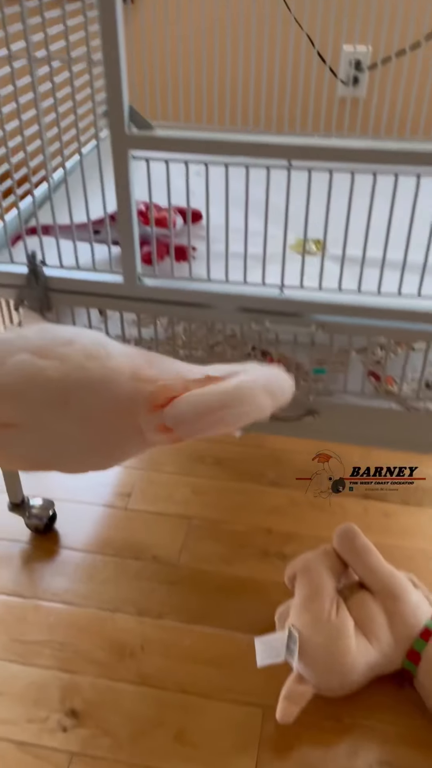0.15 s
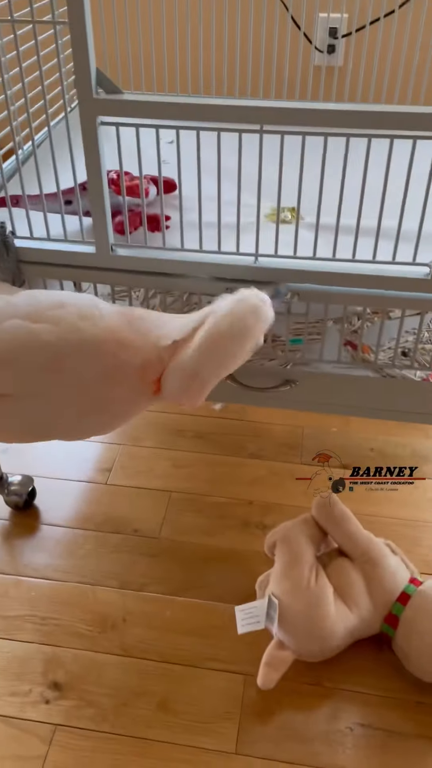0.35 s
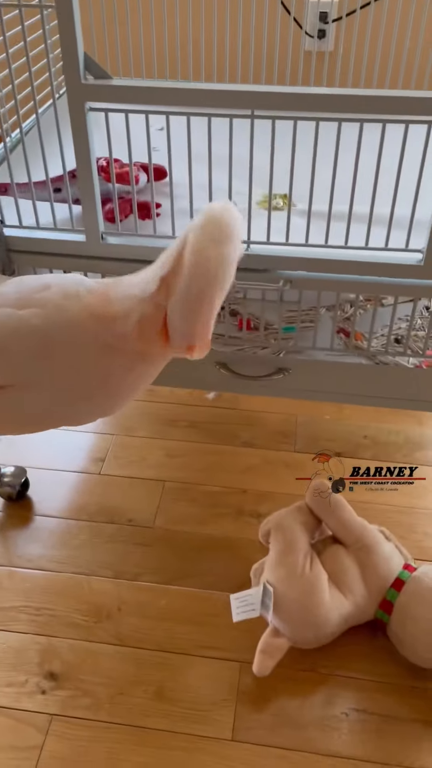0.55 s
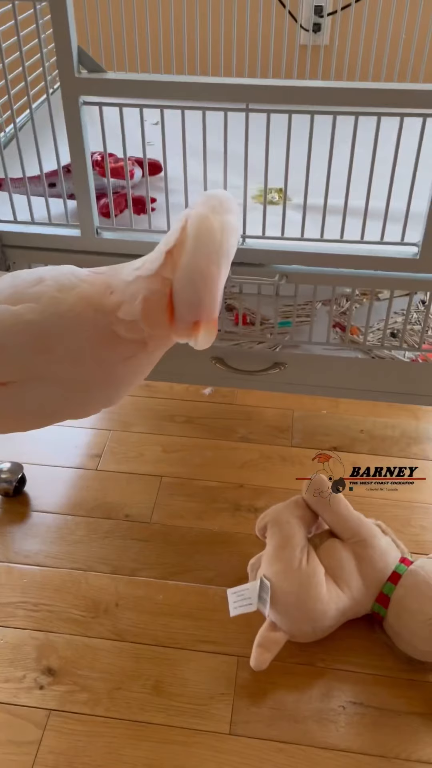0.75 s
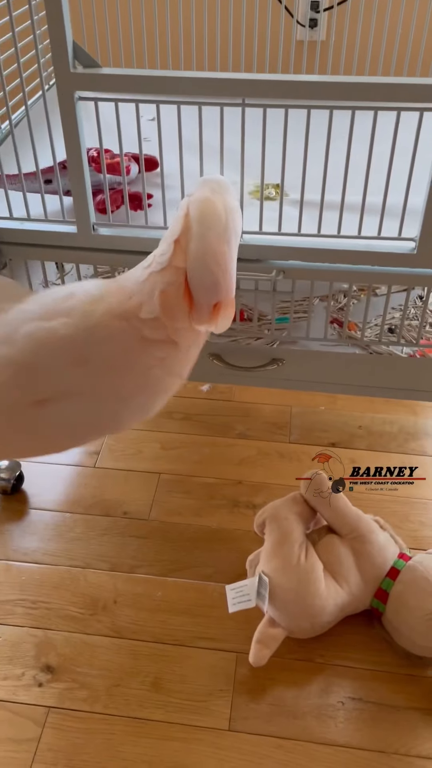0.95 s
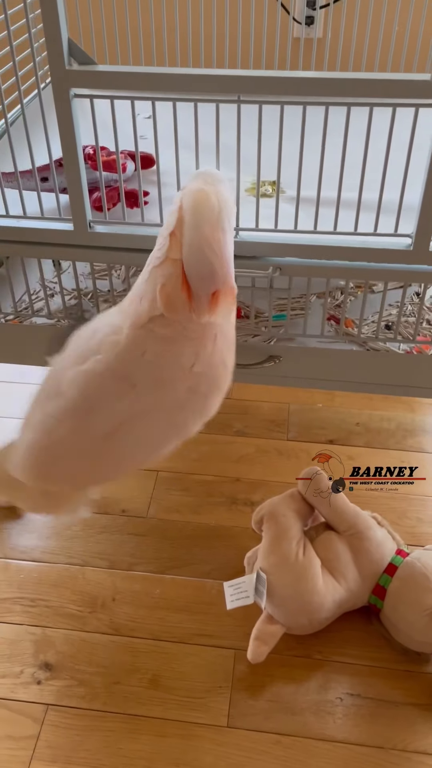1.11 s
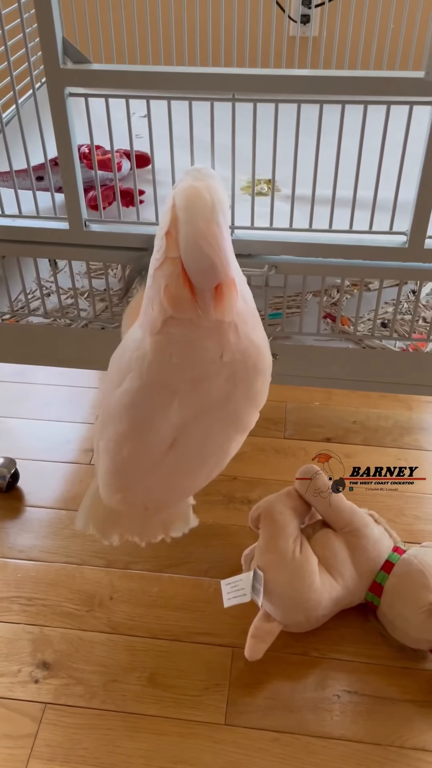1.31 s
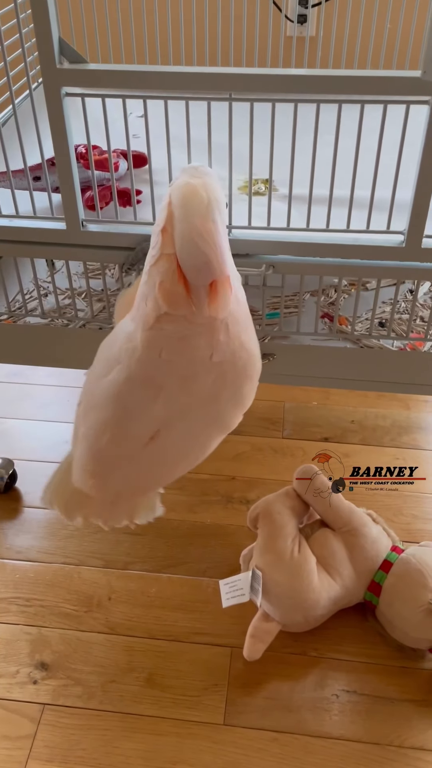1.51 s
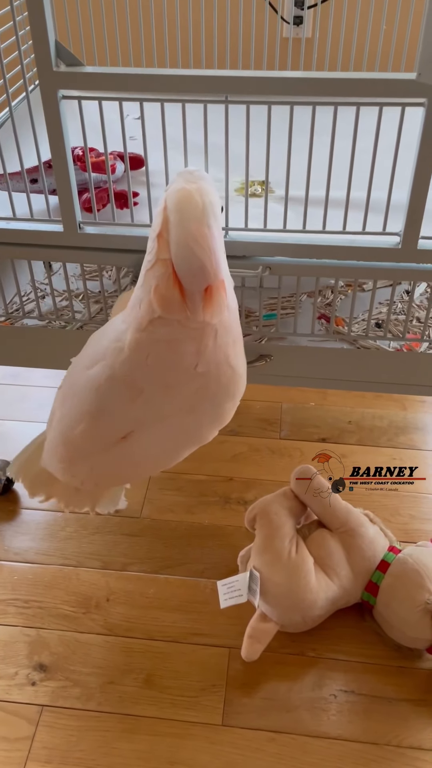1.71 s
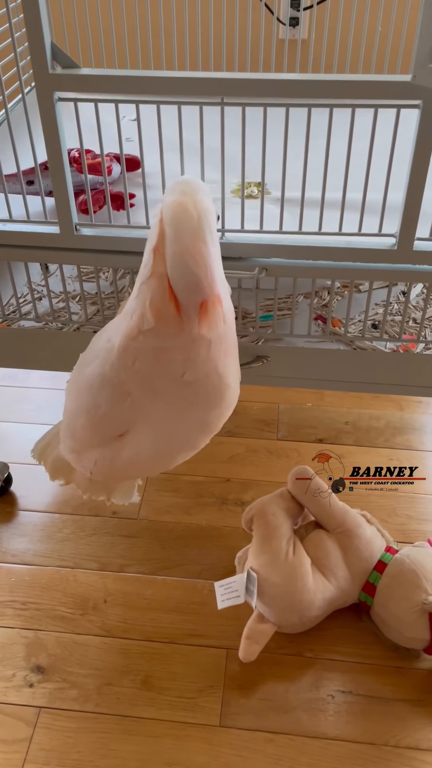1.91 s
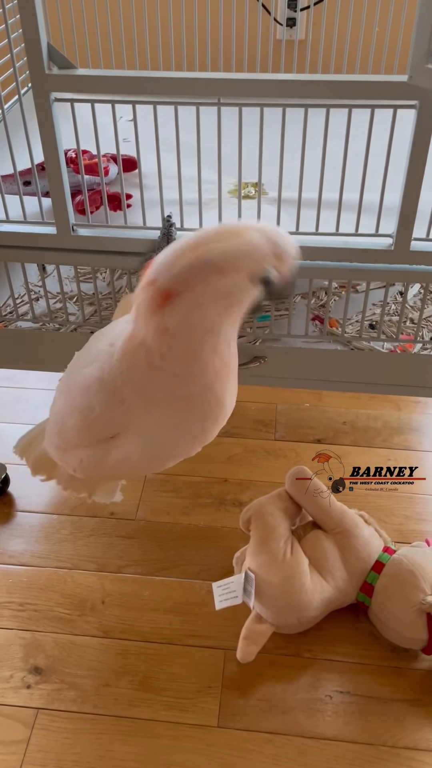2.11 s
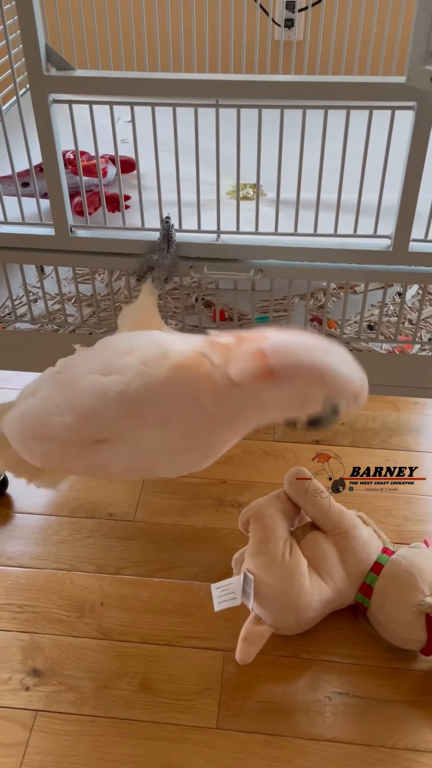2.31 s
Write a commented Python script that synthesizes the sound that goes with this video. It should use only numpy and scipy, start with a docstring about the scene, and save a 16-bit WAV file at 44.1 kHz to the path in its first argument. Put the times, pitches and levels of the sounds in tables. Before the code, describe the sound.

A cockatoo's beak and claws clank and tick on a metal cage as it climbs down.

```python
"""A cockatoo climbs down a wire cage: its beak and claws knock the frame, clank the bars and tick on wire.
The metal rings on after each touch. Feet and feathers rub along the cage, the cage body thuds under
the bird's weight and a loose panel buzzes. The living room echoes over a low, steady rumble.
Two close microphones hear it. Until scene() turns them into left and right, sounds have two rows:
what the microphones share, and what sets them apart."""
import sys
import numpy as np
from scipy import signal
from scipy.fft import rfft, irfft, next_fast_len
from scipy.io import wavfile
from scipy.ndimage import uniform_filter1d

SR = 44100
rng = np.random.default_rng(int(sys.argv[2]) if len(sys.argv) > 2 else 0)


def wav_out(sig):
    """Save sig, one row per channel (or a flat mono array), as 16-bit PCM at SR to the path in sys.argv[1]."""
    wavfile.write(sys.argv[1], SR, np.round(np.clip(np.atleast_2d(sig).T, -1, 1) * 32767).astype(np.int16))


N = 103635

BLOW_S = 0.018  # a contact's level is its strength with all its energy packed into this time
WANDER_HZ, WANDER_PER_S = 11.7, 60.8  # loose wires buzz against each other, so their pitch is unsteady


def amp(db):
    """Turn decibels into a number to multiply by."""
    return 10 ** (np.asarray(db) / 20)


def unit(x):
    """Scale to an average strength (rms) of 1."""
    return x / np.sqrt(np.mean(x ** 2) + 1e-20)


def unit_energy(x):
    """Scale to an average energy of 1 per row."""
    return unit(x) / np.sqrt(x.shape[-1])


def along(points, hz):
    """Read between (f/Hz, value) points, with octaves evenly spaced."""
    f, v = np.transpose(points)
    return np.interp(np.log(hz + 1), np.log(f + 1), v)


def coloured(x, points):
    """Give a sound a tone colour: make each frequency as strong as the (f/Hz, level/dB) points say."""
    size = 2 * next_fast_len(x.shape[-1] // 2 + 4096)
    gain = amp(along(points, np.fft.rfftfreq(size, 1 / SR)))
    cepstrum = irfft(np.log(gain))
    cepstrum[1:size // 2] *= 2  # fold onto the first half, so nothing sounds before its cause
    cepstrum[size // 2 + 1:] = 0
    return irfft(rfft(x, size) * np.exp(rfft(cepstrum)), size)[..., :x.shape[-1]]


def blend(parts):
    """The tone colour of several (level/dB, colour) parts sounding together."""
    hz = np.linspace(0, SR / 2, 400)
    power = sum((amp(db) * unit(amp(along(colour, hz)))) ** 2 for db, colour in parts)
    return np.transpose([hz, 10 * np.log10(power)])


def add(out, start, x):
    """Mix x into out from the start time in seconds."""
    i = max(0, round(start * SR))
    part = x[:, :max(0, N - i)]
    out[:, i:i + part.shape[1]] += part


def rumble():
    """The low background of the house, drifting slowly in level."""
    # tone colour of the rumble: f/Hz, level/dB
    colour = [(25, -22), (45, -14.5), (85, 0), (102, -7), (120, -1), (170, -5.5), (260, -1.5), (350, -7.5),
              (480, -17), (800, -25), (1600, -28.5), (3200, -40.5), (8000, -47.5), (15000, -45.5)]
    # its slow drift: t/s, level/dB
    drift = [(0, -50.5), (.45, -49), (.85, -46.5), (1.25, -50), (1.801, -50.5), (2.35, -50)]
    level_db = np.interp(np.arange(N) / SR, *np.transpose(drift))
    noise = rng.standard_normal((2, N + SR // 10))
    return amp(level_db) * unit(coloured(noise, colour)[:, -N:])


def contacts():
    """Each touch of beak or claw chatters briefly on frame, bar and wire, and sets cage and room ringing."""
    # touches: t/s, rise/s, fade/s, knock/dB, clank/dB, tick/dB, bar ring/dB, room and mesh answer/dB,
    # wire f/Hz, ping/dB, ping fade/s (a fade is always the time to fall by 60 dB)
    touches = [ (.2270, 0.00023, 0.013, -40, -37.5, -45.5, -43.5, 3.5, 2351, -40.5, 0.17),
               (0.5525, 0.0014, 0.018, -46.5, -51, -53.5, -68, 1, 4940, -48, 0.66),
               (0.6424, 0.0012, 0.027, -40, -42.5, -43, -53.5, -1, 4940, -45.5, 0.38),
               (0.826, 0.0029, 0.041, -51, -46.5, -41, -61, -0.5, 4970, -49.5, 0.25),
               (0.8809, .002, 0.058, -66, -40.5, -25.5, -48, -5, 5550, -39.5, 0.031),
               (0.995, 0.045, 0.05, -52, -36, -46.5, -49, 0, 4670, -41, 0.24),
               (1.0140, 0.0062, 0.11, -49, -32.5, -30.5, -40, -5.5, 7710, -26.5, .09),
               (1.040, 0.00027, 0.05, -50, -39.5, -29.5, -39, 1.5, 5880, -29.5, 0.12),
               (1.0490, 0.0012, 0.068, -45, -36, -32.5, -41.5, -5.5, 4760, -35, .15),
               (1.299, 0.0036, 0.038, -58, -45, -43, -56, 2.5, 4896, -39.5, 0.34),
               (1.3650, 0.0017, 0.014, -60.5, -51.5, -42, -65, 4.5, 3730, -51, .15),
               (1.385, .008, 0.12, -53.5, -50, -57, -55, 1, 2436, -46.5, 0.14),
               (1.5330, 0.012, 0.082, -62, -54.5, -49.5, -58, 3.5, 3570, -41.5, 0.096),
               (1.567, 0.005, .05, -66, -47.5, -49, -63, -0.5, 3930, -46, 0.19),
               (1.6264, .001, 0.067, -51, -43, -48, -65, -3.5, 3352, -43.5, .12),
               (1.8, 0.0031, 0.027, -65, -60, -57.5, -65.5, 3.5, 3750, -61, .15),
               (1.897, 0.0022, 0.047, -52.5, -44, -36.5, -55.5, -1, 3485, -47.5, .15),
               (2.328, 0.0008, 0.024, -70.5, -58, -52, -59, 8.5, 5040, -63, .2)]
    # tone colours of frame knock, bar clank and claw tick: f/Hz, level/dB
    knock = [(150, -34), (350, -15.5), (600, -8), (1200, -5), (1650, -0.5), (2150, -1.5), (2600, -2),
             (3300, -4), (4200, -18), (8000, -13.5), (16000, -91)]
    clank = [(400, -41.5), (1800, -16), (3300, -3), (4100, 1.5), (4800, -2.5), (6500, 0.5), (8000, 3),
             (9300, 0), (11000, -7), (16000, -44)]
    tick = [(1000, -43), (5000, -24), (7500, -4.5), (9400, -3), (10800, 2.5), (11600, -0.5), (12300, -3.5),
            (12900, -1), (13500, -8.5), (14600, -13.5), (15400, -14.5), (16200, -31)]
    # ringing tones of the bars and of the frame: f/Hz, level/dB, fade/s
    bar_tones = [(2984, -7, 0.54), (3233, -10, 0.99), (3700, -12.5, .9), (4680, -2, 0.81),
                 (4734, -1.5, 0.47), (4860, -7, .65), (4900, -14, 0.41), (5150, -5.5, 0.28),
                 (5750, -8, .45), (5860, -7, 0.31), (5940, -4, .4), (6080, -3, .5), (6470, -13.5, 0.83),
                 (6490, -7, 1), (6580, -7, .55), (7370, -7.5, 0.6), (7948, -6.5, .45)]
    frame_tones = [(654, -6, 0.15), (846, -5.5, 1.34), (950, -8.5, 1.4), (1394, -3.5, 1.3), (1600, 2, 0.83),
                   (1930, 5, 0.27), (2345, -29, 1.8), (2535, -10.5, 0.5)]
    chatter_db, mesh_db, frame_db = 0.5, -5.5, -19  # unevenness; mesh against room; frame against knock
    out, t = np.zeros((2, N)), np.arange(SR) / SR
    wires = mesh(t, count=200)
    for (start, rise, fade, knock_db, clank_db, tick_db, ring_db, answer_db,
         wire_hz, ping_db, ping_fade) in touches:
        onset = 1 - np.exp(-t / rise)
        chatter = amp(chatter_db * unit(uniform_filter1d(rng.standard_normal(SR), size=30)))
        blow = unit_energy(chatter * onset * amp(-60 * t / fade) * rng.standard_normal((2, SR)))
        mesh_ring = signal.fftconvolve(blow[:, :SR // 10], wires, axes=1)[:, :SR]
        echo = room_echo(extra_build_s=0.31 * fade)  # a longer chatter fills the room more slowly
        answer = echo + amp(mesh_db) * mesh_ring
        colour = blend([(knock_db, knock), (clank_db, clank), (tick_db, tick)])
        add(out, start, np.sqrt(BLOW_S * SR) * coloured(blow + amp(answer_db) * answer, colour))
        bars = amp(ring_db) * ringing(bar_tones, t, WANDER_HZ)
        frame = amp(knock_db + frame_db) * ringing(frame_tones, t)
        wire = amp(ping_db) * in_room(onset * ping(wire_hz, ping_fade, t, count=10), room_db=-8.5)
        add(out, start, onset * (bars + frame) + wire)
    return out


def ringing(tones, t, wander_hz=0):
    """Metal rings in dying tones (f/Hz, level/dB, fade/s), each with a random strength and phase."""
    hz, db, fade = np.transpose(tones)[:, :, None]
    if wander_hz:
        turn_times = np.arange(200) / WANDER_PER_S
        offsets = rng.standard_normal((len(tones), len(turn_times)))
        hz = hz + wander_hz * np.array([np.interp(t, turn_times, row) for row in offsets])
    cycles = np.cumsum(hz * np.ones_like(t), axis=1) / SR
    scatter_db = 5 * rng.standard_normal(db.shape)
    waves = amp(db + scatter_db - 60 * t / fade) * np.exp(2j * np.pi * cycles)
    phases = np.exp(2j * np.pi * rng.random((2, len(tones))))
    return (phases @ waves).imag


def mesh(t, count):
    """The cage's many thin wires ring along with a blow, each at its own pitch."""
    low_hz, high_hz, fade_s = 802, 8970, 0.42
    pitches = low_hz + (high_hz - low_hz) * rng.random(count) ** 1.3
    return unit_energy(ringing([(hz, 0, fade_s) for hz in pitches], t))


def room_echo(extra_build_s=0):
    """A fresh echo of the room: noise that builds up, then dies at its own speed at each frequency."""
    # how long the room rings: f/Hz, fade/s
    room_fades = [(200, 0.14), (800, 0.97), (2000, 0.63), (5000, 0.76), (9000, 0.18), (15000, 0.42)]
    hz, t, spectra = signal.stft(rng.standard_normal((2, SR)), SR, nperseg=256)
    decay = amp(-60 * t / along(room_fades, hz)[:, None])
    tail = signal.istft(spectra * decay, SR, nperseg=256)[1][:, :SR]
    build_s = 0.0014 + extra_build_s
    return unit_energy(tail * (1 - np.exp(-np.arange(SR) / SR / build_s)))


def in_room(x, room_db):
    """A sound plus the room's echo of it."""
    return x + amp(room_db) * signal.fftconvolve(x[:1], room_echo(), axes=1)[:, :x.shape[1]]


def ping(hz, fade, t, count):
    """One wire and its similar neighbours ring at nearly the same pitch."""
    spread = 0.028  # share of the pitch
    detune = spread * np.linspace(-1, 1, count) ** 3 + spread / 2 * rng.standard_normal(count)
    tones = [(f, 0, fade) for f in hz * (1 + detune)]
    return np.sqrt(BLOW_S * SR) * unit_energy(ringing(tones, t, WANDER_HZ))


def struck(tones, hz, t):
    """A clean blow starts all tones (ratio to hz, level/dB, fade/s) together, in the shared row only."""
    ring = sum(amp(db - 60 * t / fade) * np.sin(2 * np.pi * ratio * hz * t) for ratio, db, fade in tones)
    return np.array([ring, np.zeros_like(ring)])


def clacks():
    """The hardest knocks on the frame start with a very short clack."""
    # clacks: t/s, f/Hz, level/dB
    hits = [(0.2275, 2190, -21.5), (.6424, 1880, -25.5)]
    # the frame's fastest-dying tones: ratio to the clack's pitch, level/dB, fade/s
    clack_tones = [(.64, -13.5, 0.015), (1, -2, 0.012), (1.33, -12, 0.027)]
    out, t = np.zeros((2, N)), np.arange(SR // 2) / SR
    for start, hz, db in hits:
        add(out, start, amp(db) * in_room(struck(clack_tones, hz, t), room_db=-1))
    return out


def rubs():
    """Feet and feathers slide on the cage, making soft, grainy swells of noise."""
    # slides: t/s, rise/s, fade/s, level/dB
    slides = [(0.351, 0.023, 0.2, -50.5), (0.884, 0.0044, 0.16, -44.5), (.910, 0.014, 0.3, -40.5),
              (1.108, 0.011, 0.36, -41.5), (1.15, 0.02, 0.14, -43.5)]
    # tone colour of a rub: f/Hz, level/dB
    colour = [(150, -18), (350, -13), (500, -1), (700, -3), (850, -7), (1100, -1.5), (1450, -4), (1750, -7),
              (3000, -12.5), (6000, -11), (14000, -41)]
    grain_db, room_db = 2, -4.5
    out, t = np.zeros((2, N)), np.arange(SR // 2) / SR
    for start, rise, fade, db in slides:
        grain = amp(grain_db * unit(uniform_filter1d(rng.standard_normal(len(t)), size=90)))
        swell = np.minimum(t / rise, 1) * amp(-60 * np.maximum(t - rise, 0) / fade)
        rub = amp(db) * swell * unit(coloured(grain * rng.standard_normal((2, len(t))), colour))
        add(out, start, rub)
        add(out, start, amp(room_db) * signal.fftconvolve(rub, room_echo(), axes=1))
    return out


def thuds():
    """The cage body answers a shift of the bird's weight with a short, hollow note."""
    # shifts of weight: t/s, f/Hz, level/dB
    shifts = [(.5513, 644, -45.5), (.6422, 640, -34.5), (.914, 479, -40), (1.163, 663, -44)]
    # tones of the cage body: ratio to the thud's pitch, level/dB, fade/s
    body_tones = [(1, -1, 0.085), (0.813, -10, 0.095), (1.28, -8, 0.055), (1.4, -8.5, 0.052)]
    out, t = np.zeros((2, N)), np.arange(SR // 2) / SR
    for start, hz, db in shifts:
        add(out, start, amp(db) * in_room(struck(body_tones, hz, t), room_db=-4))
    return out


def rattles():
    """A loose panel buzzes briefly as the bird pulls on it."""
    # pulls: t/s, f/Hz, level/dB
    pulls = [(0.923, 1410, -38.5), (1.111, 1370, -42), (1.158, 1130, -43)]
    rise_s, fade_s = 0.0063, 0.22
    out, t = np.zeros((2, N)), np.arange(SR // 2) / SR
    for start, hz, db in pulls:
        add(out, start, amp(db) * (1 - np.exp(-t / rise_s)) * ping(hz, fade_s, t, count=8))
    return out


def scene():
    """All sounds reach two close microphones, which hear each frequency a little differently."""
    # how alike the two sides are: f/Hz, likeness (1 = fully alike)
    likeness = [(80, .998), (200, .98), (400, .93), (850, .76), (1900, .95), (2700, .58), (4200, .48),
                (5800, .85), (7500, .82), (9100, .998), (10200, .998), (12000, .8), (14500, .99)]
    # how far the left wave runs ahead of the right: f/Hz, lead/radians
    lead = [(250, 0), (1100, -.35), (2000, .1), (3800, -1), (4400, -2.5), (5000, -1.7), (5600, .5),
            (7700, 2.1), (9200, 3.1), (10400, 3.2), (12000, 4.7), (14000, 6.28)]
    # how much louder the left side is: f/Hz, level/dB
    balance = [(60, .2), (150, 1), (350, 2), (750, 4.8), (1700, 1), (3400, -1.5), (5000, .4), (14000, 0)]
    size = next_fast_len(N + 8192)
    hz = np.fft.rfftfreq(size, 1 / SR)
    shared, apart = rfft(contacts() + clacks() + thuds() + rattles() + rubs() + rumble(), size)
    sides = np.array([[1], [-1]])  # left, right
    mix_angle = np.arccos(np.clip(along(likeness, hz), 0, 1)) / 2
    pair = np.cos(mix_angle) * shared + sides * np.sin(mix_angle) * apart
    gain = amp(sides * along(balance, hz) / 2)
    phase_shift = np.exp(0.5j * sides * along(lead, hz))
    return irfft(pair * gain * phase_shift, size)[:, :N]


def record(dry):
    """The very highest treble is cut off steeply."""
    top_hz = 15950
    size = next_fast_len(N + 8192)
    hz = np.fft.rfftfreq(size, 1 / SR)
    return irfft(rfft(dry, size) / (1 + (hz / top_hz) ** 120), size)[:, :N]


dry = scene()
out = record(dry)
wav_out(out)
```